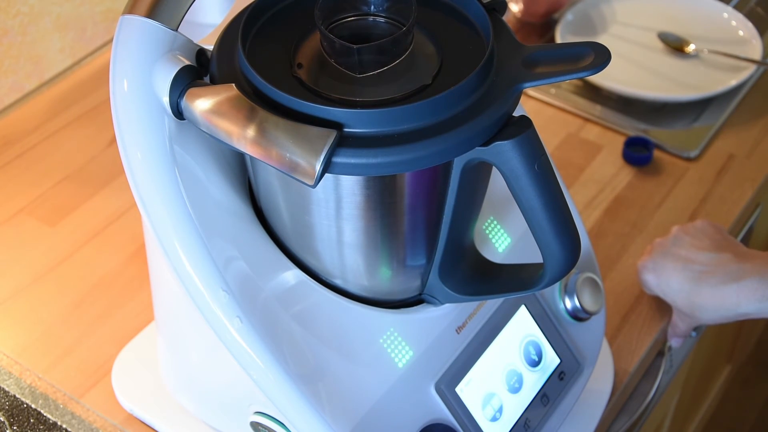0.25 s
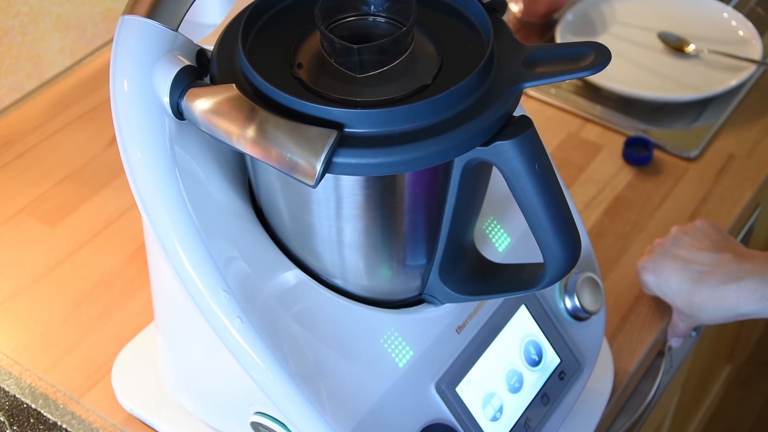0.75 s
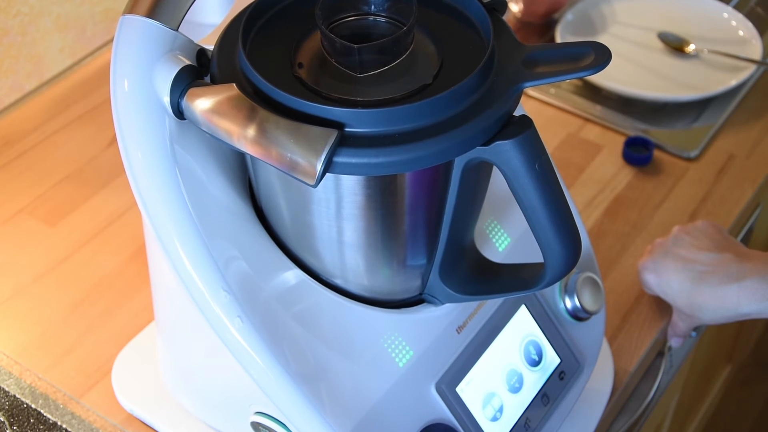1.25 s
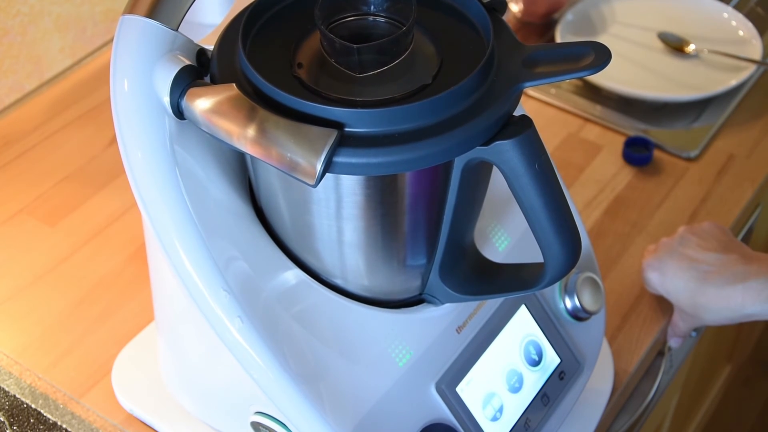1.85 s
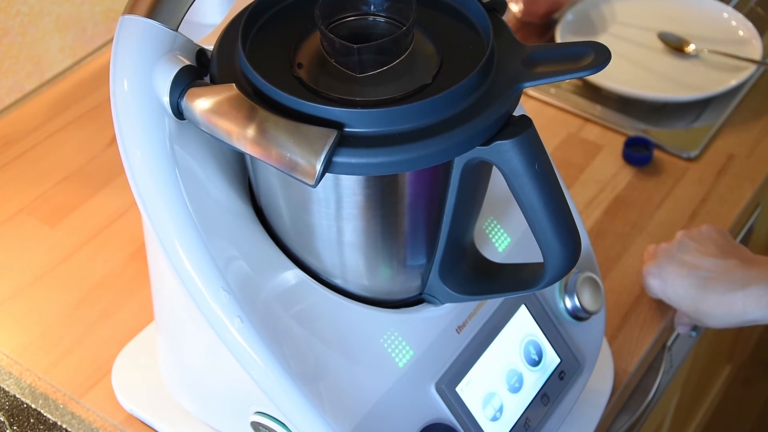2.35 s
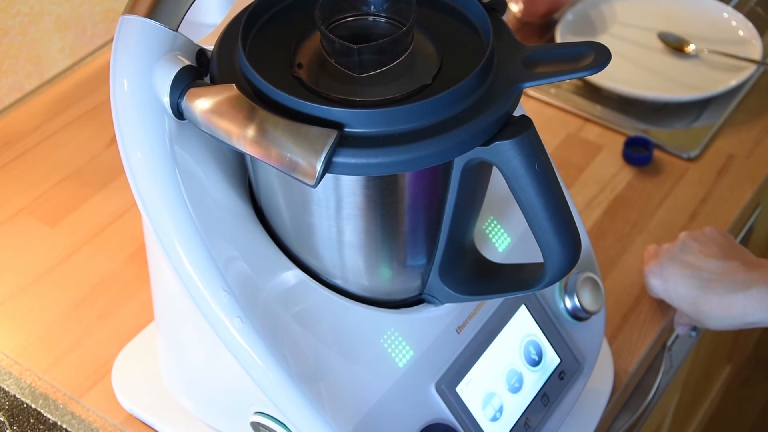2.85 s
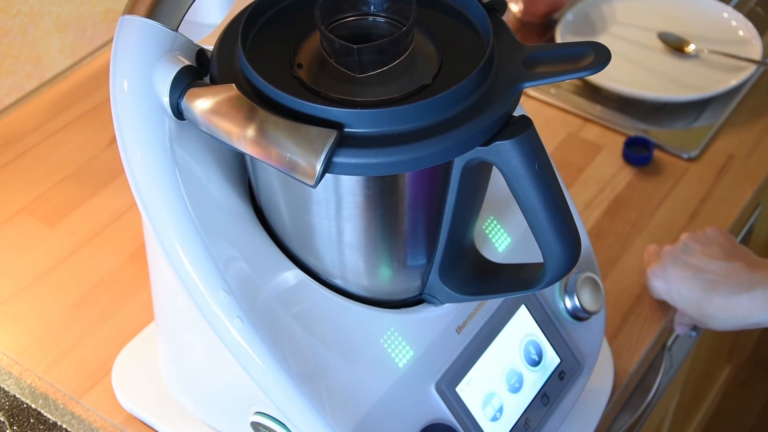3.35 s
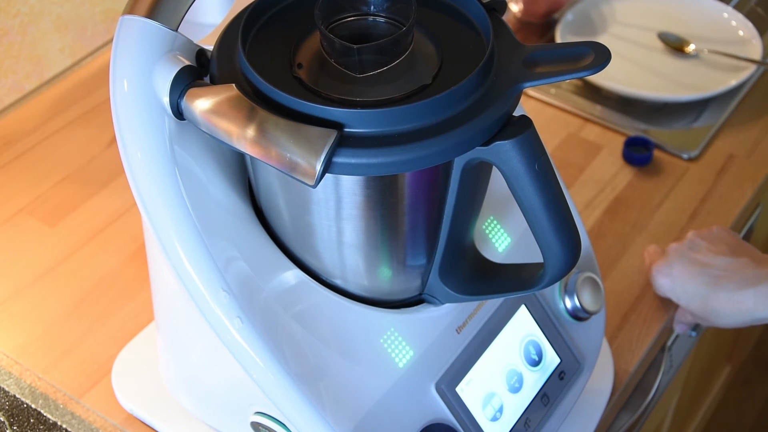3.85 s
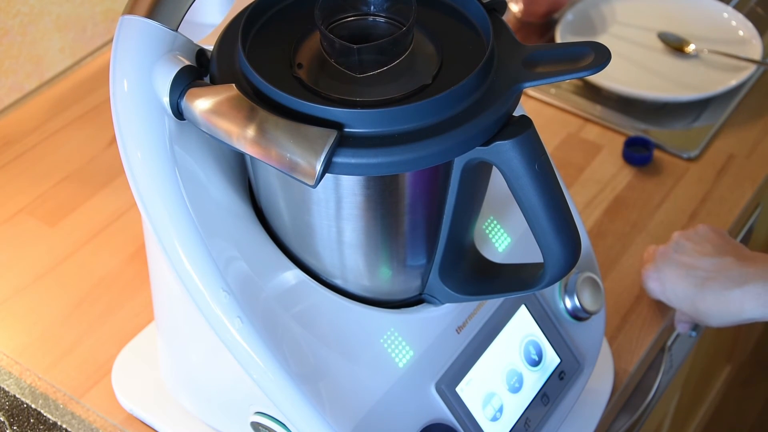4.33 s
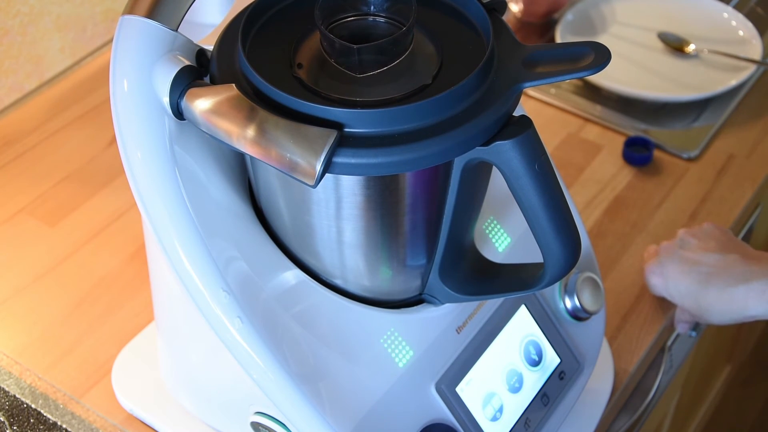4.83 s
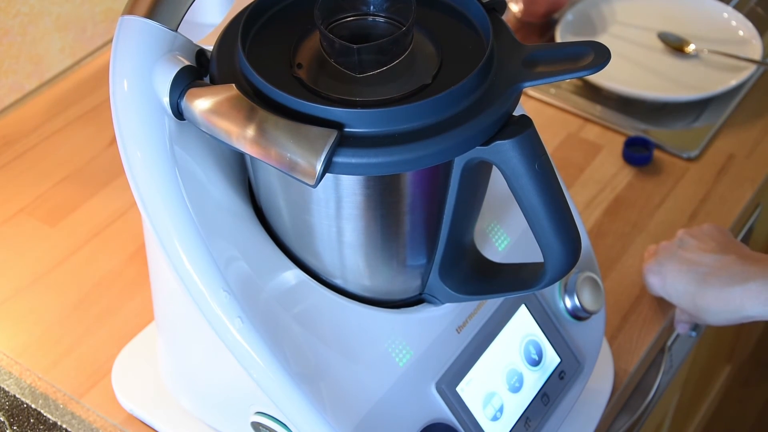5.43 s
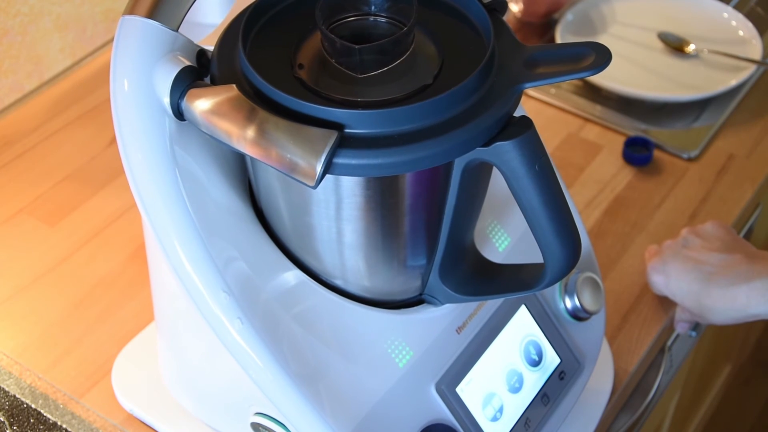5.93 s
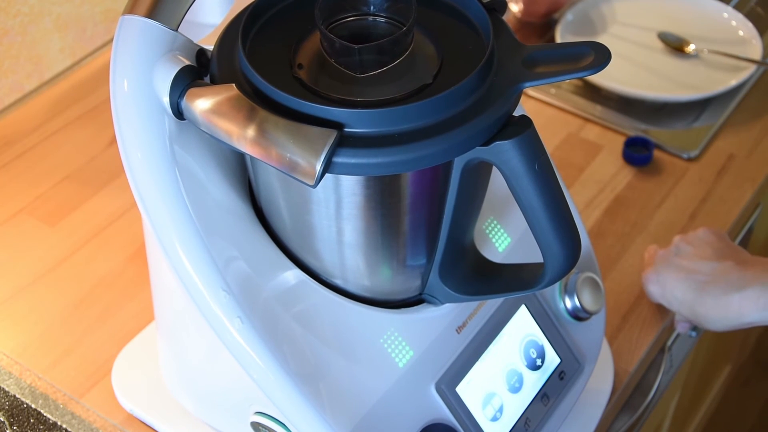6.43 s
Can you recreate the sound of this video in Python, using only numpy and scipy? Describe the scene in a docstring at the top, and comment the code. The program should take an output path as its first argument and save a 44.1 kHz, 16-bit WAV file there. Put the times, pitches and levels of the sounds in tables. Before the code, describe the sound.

A food processor runs twice, heard from close by in a small kitchen. The first burst is a rough motor churn with a wavering tone, dull thumps and light spatter on steel. It winds down, leaving soft room hiss. The second burst is brief and labours harder, with flurries of bits hitting the bowl, and a bright, ringing click of the lid lock follows.

```python
"""A small kitchen, close to a food processor that churns a thick mixture in two bursts.
Each burst strains against the settled mass, runs free and coasts down. The motor's rough knocking rings
the housing, while the blade thumps the mass and flings flurries of bits against the steel bowl.
The drive whines briefly as it starts and brakes; at the end the lid lock snaps and chatters."""
import sys
import numpy as np
from scipy import signal
from scipy.fft import rfft, irfft, next_fast_len
from scipy.io import wavfile
from scipy.ndimage import map_coordinates

SR = 44100
rng = np.random.default_rng(int(sys.argv[2]) if len(sys.argv) > 2 else 0)


def generate_wav(signal):
    """Clip the signal to [-1, 1] and save it as 16-bit WAV at the path in sys.argv[1]."""
    frames = np.transpose(np.atleast_2d(signal))
    scaled = np.clip(frames, -1, 1) * 32767
    pcm = np.round(scaled).astype(np.int16)
    wavfile.write(sys.argv[1], SR, pcm)


N = 295019
T = np.arange(N) / SR
SIZE = next_fast_len(N + SR // 4)
HZ = np.fft.rfftfreq(SIZE, 1 / SR)

# runs of the motor: start_s, brake_s, stiff_for_s, knock_db, stiff_strain_db, loose_strain_db,
# patter_db, churn_db
BURSTS = [(0.308, 2.631, 0.13, -24, -31.5, -42.5, -55.5, -42),
          (5.327, 6.167, 0.346, -23.5, -26, -29, -43, -38.5)]
ATTACK_S = 0.0088


def effort():
    """Gains of the motor's knocking, strain and free running: it labours until the mass gives way."""
    give_way_s = 0.014
    knocking, strain, freed = np.zeros((3, N))
    for start, brake, stiff_for, knock_db, stiff_db, loose_db, _, _ in BURSTS:
        turning = held(start, brake, ATTACK_S, fall_db_per_s=114)
        loose = (1 + np.tanh((T - start - stiff_for) / give_way_s)) / 2
        knocking += turning * amp(knock_db)
        strain += turning * amp(stiff_db + (loose_db - stiff_db) * loose)
        freed += turning * loose
    return knocking, strain, freed


def motor(knocking, strain):
    """Dense uneven knocks ring the housing; heavy load wakes further resonances; the drive hisses."""
    housing_colour = [(50, -52), (80, -62), (110, -33), (260, -21.5), (385, -21.5), (470, -16),
                      (700, -21.5), (850, -11.5), (1400, -13.5), (1950, -17), (2600, -19.5), (3000, -31.5),
                      (4200, -32), (6000, -43), (11500, -52), (15000, -67)]  # broad tone of the housing: freq_hz, level_db
    housing_modes = [(203.6, 14, -17), (295, 56, -19), (537.7, 26, -8), (573.4, 19.5, -3.5),
                     (936, 12, -5.5), (1031, 9.7, -3.5), (1090, 24, -6.5), (1256, 77, -15), (1292, 15, -6),
                     (1702, 215, -10.5), (1758, 30, -6), (1806, 33, -1), (1892, 30, -2), (2320, 20, -15),
                     (2513, 26, -15), (3446, 383, -27.5)]  # its free resonances: pitch_hz, width_hz, level_db
    strain_modes = [(190.8, 9.7, -5.5), (300, 41, -15.5), (815, 27, -7.5), (1064, 98, -0.5),
                    (1260, 75, -6.5), (1754, 130, 0.5), (2600, 430, -21)]  # its resonances under load: pitch_hz, width_hz, level_db
    hiss_modes = [(9800, 1000, 2), (11100, 700, 7)]  # peaks of the electrical hiss: pitch_hz, width_hz, level_db
    level = knocking * amp(0.47 * wobble(35) + 0.32 * wobble(8))
    housing = unit(filtered(impacts(rate=4500, scatter_db=1), body(housing_colour, housing_modes)))
    strained = unit(filtered(impacts(rate=2300, scatter_db=1), body(modes=strain_modes)))
    # load shifts the energy from the free resonances to the strained ones
    free = level / np.hypot(1, 0.74 * strain / (knocking + 1e-12))
    hiss = unit(filtered(rng.standard_normal(N), body(modes=hiss_modes)))
    hiss_db, hang_s = -57, 0.19
    powered = sum(held(start, brake + hang_s, ATTACK_S, fall_db_per_s=190) for start, brake, *_ in BURSTS)
    return free * housing + strain * strained + amp(hiss_db) * powered * hiss


def singing(freed):
    """Once the blade runs free, one housing resonance is kept going and sings as a wavering tone."""
    pitch_hz = 945.5 * (1 + 0.0135 * wobble(110))
    level = freed * amp(-29 + 1.05 * wobble(8) + 2.1 * wobble(70))
    return level * np.sin(2 * np.pi * np.cumsum(pitch_hz) / SR)


def jolts():
    """The sudden torque of each start shakes the whole machine."""
    kicks = [(0.318, -23), (5.334, -25.5)]  # torque kicks: start_s, level_db
    frame_modes = [(276, 29, 1), (540, 115, -1.5), (688, 44, -3.5), (871, 21, 0), (1580, 270, -1.5),
                   (3700, 1600, -22)]  # what they ring: pitch_hz, width_hz, level_db
    shake = sum(amp(db) * fading(start, t60=0.71) for start, db in kicks)
    return coloured(shake * rng.standard_normal(N), body(modes=frame_modes))


def churn():
    """The blade beats the thick mass, hardest at first, and now and then a lump drops."""
    lumps = [(0.316, 0.0092, -31), (0.742, 0.018, -24), (1.587, 0.016, -31), (1.866, 0.014, -28),
             (2.185, 0.018, -26), (2.867, 0.0075, -37.5), (2.933, .015, -40), (5.33, .025, -25),
             (5.404, .02, -34), (6.151, 0.16, -36)]  # falling lumps: start_s, length_s, relative_db
    # dull tone of the mass and of a lump: freq_hz, level_db
    mass = body([(50, -63), (90, -14), (120, -5), (155, -5), (195, 6.5), (300, -1.5), (380, -7),
                 (1200, -52)])
    lump = body([(50, -54), (85, -22), (125, 0), (200, 4.5), (300, 1), (400, -7), (1200, -52)])
    load = np.zeros(N)
    for start, brake, *_, churn_db in BURSTS:
        first_cuts = amp(-28) * fading(start, t60=0.56)
        load += held(start, brake, ATTACK_S, fall_db_per_s=75) * np.hypot(amp(churn_db), first_cuts)
    beating = load * amp(3.2 * wobble(12) - 6) * unit(filtered(impacts(rate=200, scatter_db=0), mass))
    drops = sum(amp(db) * held(start, start + length, rise_s=0.0022, fall_db_per_s=450)
                for start, length, db in lumps)
    return beating + amp(-11.5) * coloured(drops * rng.standard_normal(N), lump)


def patter():
    """Gain of the bits hitting the bowl: a shower at each start, a steady trickle, flurries on top."""
    flurries = [(0.355, 0.039, -36), (0.478, 0.078, -44.5), (1.434, .01, -45), (1.579, .025, -40.5),
                (1.634, 0.028, -37), (1.68, 0.035, -38), (1.863, 0.018, -48), (1.964, .02, -53),
                (2.133, 0.015, -43), (2.244, .025, -44), (2.478, .01, -46), (2.596, .04, -41),
                (5.724, 0.024, -34), (5.81, 0.024, -41), (5.858, .04, -34.5), (5.926, 0.027, -35.5),
                (5.975, 0.021, -33), (6.026, 0.032, -33.5), (6.06, 0.033, -32), (6.127, 0.073, -36.5),
                (6.23, 0.044, -35)]  # clusters of flung bits: start_s, length_s, level_db
    gains = []
    for start, brake, *_, patter_db, _ in BURSTS:
        shower = amp(-36) * fading(start, t60=0.3)
        gains.append(held(start, brake, ATTACK_S, fall_db_per_s=64) * np.hypot(amp(patter_db), shower))
    for start, length, db in flurries:
        gains.append(amp(db) * held(start, start + length, rise_s=0.0048, fall_db_per_s=295))
    return np.linalg.norm(gains, axis=0)


def spray():
    """Flung bits patter on the steel wall; wet smears swish and a few hard bits tick."""
    bowl_colour = [(1500, -27.5), (3000, -8), (4800, -13), (9000, -17.5), (11500, -18), (13000, -33),
                   (15000, -39)]  # broad tone of the steel bowl: freq_hz, level_db
    bowl_modes = [(3304, 220, -1.5), (3846, 400, -3), (4290, 130, -4), (5481, 130, -15), (6167, 455, -11),
                  (7308, 370, -10), (7824, 180, -7), (8531, 400, -6), (9229, 400, -16), (12085, 120, -20)]  # its resonances: pitch_hz, width_hz, level_db
    swishes = [(.55, .12, -53), (1.245, 0.018, -50), (2.28, 0.091, -59), (2.475, 0.016, -43.5)]  # wet smears: centre_s, half_length_s, level_db
    swish_colour = [(5000, -32), (8500, -4), (10500, 4), (13000, -13), (15500, -20)]  # their airy tone: freq_hz, level_db
    ticks = [(.857, -24, 3340), (1.523, -26.5, 5200), (1.687, -25, 3300), (2.14, -33, 5800),
             (2.634, -22, 3730), (5.469, -17.5, 3530), (5.477, -20, 3570), (5.730, -21, 4100)]  # hard bits on the bowl: start_s, relative_db, pitch_hz
    steel = body(bowl_colour, bowl_modes)
    out = patter() * amp(1.86 * wobble(90)) * unit(filtered(impacts(rate=3000, scatter_db=2.5), steel))
    smears = sum(amp(db) * np.exp(-((T - centre) / half) ** 2) for centre, half, db in swishes)
    out += smears * unit(filtered(rng.standard_normal(N), amp(along(swish_colour, HZ))))
    ringing = filtered(rng.standard_normal(N), steel)
    for start, db, hz in ticks:
        ping = unit(signal.lfilter(*signal.iirpeak(hz, Q=6, fs=SR), ringing))
        out += amp(db - 10.5) * fading(start, t60=0.053) * ping
    return out


def lid_lock():
    """The lid lock snaps and chatters: bright clicks over the ring of its arms."""
    contacts = [(6.6044, -16, -16), (6.6084, -20.5, -1), (6.6135, -27, -7), (6.632, -31, -3),
                (6.643, -35, 3), (6.669, -37.5, 11), (6.680, -40, 12.5)]  # hits of the lock: start_s, relative_db, ring_offset_db
    click_colour = [(200, -36), (380, -15.5), (520, -2), (680, -1), (1000, -4), (1400, -15), (2300, -9),
                    (3100, -3), (4100, 1), (4900, -28), (7000, -29), (8200, -23), (11000, -24),
                    (15000, -44)]  # tone of a click: freq_hz, level_db
    arm_modes = [(539, 3.5, 0.12), (962, -9.5, 0.36), (1090, -5.5, 0.15), (1716, -12, 0.73),
                 (3020, -10, .08), (3920, -19, 0.14), (3790, -3, 0.12)]  # ring of the arms: pitch_hz, level_db, t60_s
    t = np.arange(SR // 4) / SR
    onset = 1 - np.exp(-(t / 0.0032) ** 2)
    rings = np.zeros(N + SR)
    for start, db, ring_db in contacts:
        for hz, mode_db, t60 in arm_modes:
            decay = amp(mode_db + rng.normal(0, 1)) * np.exp(-np.log(1000) * t / t60)
            partial = onset * decay * np.sin(2 * np.pi * (hz * t + rng.random()))
            rings[round(start * SR):][:len(t)] += amp(db + ring_db - 4.5) * partial
    clicks = sum(amp(db) * (fading(start, t60=0.015) + amp(-14) * fading(start, t60=0.24))
                 for start, db, _ in contacts)
    return rings[:N] + amp(-5) * coloured(clicks * rng.standard_normal(N), body(click_colour))


def whine():
    """At low speed the motor's pull is heard as short gliding tones, roughest just before it spins up."""
    glides = [(0.239, .066, 1840, 1800, -55.5, 0.025), (2.745, 0.085, 560, 540, -39, .008),
              (2.808, 0.097, 481.6, 473, -49.5, 0.011), (3.036, 0.091, 952, 946, -57, 0.013),
              (5.257, 0.081, 1800, 1700, -58, 0.04), (6.324, 0.076, 500, 504, -51, 0.015),
              (6.547, 0.067, 995, 925, -59, 0.013)]  # slow-turning drive: start_s, length_s, from_hz, to_hz, level_db, flutter_share
    harmonic_colour = [(500, -35), (950, 2.5), (1100, 0), (1400, -21), (1650, -2), (1900, 0.5), (2200, -12),
                       (2800, -14), (3400, -17), (3800, -36), (5000, -70)]  # weight of the harmonics: freq_hz, level_db
    out = np.zeros(N)
    flutter, swell = wobble(200), wobble(120)
    for start, length, from_hz, to_hz, db, rough in glides:
        progress = (T - start) / length
        live = (progress > 0) & (progress < 1)
        pitch = (from_hz + (to_hz - from_hz) * progress[live]) * (1 + rough * flutter[live])
        phase = 2 * np.pi * np.cumsum(pitch) / SR
        tone = sum(amp(along(harmonic_colour, k * pitch)) * np.sin(k * phase) for k in range(1, 7))
        arch = np.sqrt(np.sin(np.pi * progress[live]))
        out[live] += amp(db + 2 * swell[live]) * unit(tone * arch)
    return out


def spatters(knocking):
    """Single drops smack the lid at random while the blade turns."""
    wet_colour = [(3000, -30), (5500, -4), (9000, -5), (11000, -1), (13500, -20), (15500, -26)]  # tone of a drop: freq_hz, level_db
    hits = impacts(rate=14, scatter_db=4)
    smack = np.exp(-np.log(1000) * T[:SR // 20] / 0.02) * rng.standard_normal(SR // 20)
    drops = signal.fftconvolve(hits, smack)[:N]
    return knocking * amp(-36.5) * unit(filtered(drops, body(wet_colour)))


def kitchen(x):
    """Walls and cupboards answer with a short tail, widest in the treble."""
    decay_times = [(200, 0.072), (2000, 0.41), (10000, 0.11)]  # decay of the room: freq_hz, t60_s
    stereo_width = [(130, -38), (300, -69), (650, -32), (1000, -12), (2000, -11), (4000, -3.5), (8000, -9),
                    (12000, 6)]  # spread of the reflections: freq_hz, side_db
    hz, t, noise = signal.stft(rng.standard_normal((2, SR // 2)), SR, nperseg=256)
    decay = np.exp(-np.log(1000) * t / along(decay_times, hz)[:, None])
    tail = signal.istft(noise * decay, SR, nperseg=256)[1]
    tail = np.pad(tail / np.linalg.norm(tail[0]), ((0, 0), (SR // 300, 0)))  # pre-delay
    mid, side = signal.fftconvolve(x[None], tail, axes=1)[:, :N]
    side = filtered(side, amp(along(stereo_width, HZ)))
    return np.array([mid + side, mid - side])


def room_tone():
    """The steady soft hiss of the room with a few faint tones."""
    air_colour = [(25, -13), (80, -3), (170, -4), (300, -1), (700, 0), (1000, -2), (2000, -7), (3500, -10),
                  (10000, -13.5), (12000, -17), (15500, -19.5)]  # tone of the hiss: freq_hz, level_db
    faint_tones = [(1154, 22, 1.5), (1465, 13, 4.5), (3920, 40, -4)]  # narrow peaks in it: pitch_hz, width_hz, level_db
    likeness = [(60, 0.74), (240, 0.9), (950, 0.71), (3770, 0.16), (15000, -0.08)]  # how alike left and right are: freq_hz, coherence
    spread = np.arccos(np.clip(along(likeness, HZ), -1, 1)) / 2
    response = body(air_colour, faint_tones) * np.array([np.cos(spread), np.sin(spread)])
    mid, side = filtered(rng.standard_normal((2, N)), response)
    return amp(-57.5) * unit(np.array([mid + side, mid - side]))


def amp(db):
    """Decibels to gain."""
    return 10 ** (np.asarray(db) / 20)


def unit(x):
    """Scale to rms 1."""
    return x / np.sqrt(np.mean(x ** 2) + 1e-20)


def along(points, hz):
    """Read (freq_hz, value) points on a log frequency axis."""
    freqs, values = np.transpose(points)
    return np.interp(np.log(hz + 1), np.log(freqs + 1), values)


def wobble(rate):
    """A smooth random curve, rate knots a second."""
    return map_coordinates(rng.standard_normal(int(N * rate / SR) + 4), [T * rate], mode="nearest")


def impacts(rate, scatter_db):
    """Irregular impulses, about rate a second, scattered in level."""
    hits = (rng.random(N) < rate / SR) * rng.choice([-1, 1], N)
    return hits * amp(scatter_db * np.clip(rng.standard_normal(N), -2, 2))


def held(start, stop, rise_s, fall_db_per_s):
    """An envelope that rises at start, holds until stop and then falls steadily."""
    return np.clip((T - start) / rise_s, 0, 1) * amp(-fall_db_per_s * np.maximum(T - stop, 0))


def fading(start, t60):
    """An envelope that jumps up at start and loses 60 dB in t60 seconds."""
    return (T >= start) * np.exp(-np.log(1000) * np.abs(T - start) / t60)


def body(colour=None, modes=()):
    """Causal response of a broad colour with resonances standing out of it."""
    power = amp(along(colour, HZ)) ** 2 if colour is not None else np.zeros(len(HZ))
    for hz, width, db in modes:
        detuning = (HZ ** 2 - hz ** 2) / ((HZ + 1) * width)
        power += amp(db) ** 2 / np.hypot(1, detuning) ** 3
    # minimum phase: the ring follows the hit
    cepstrum = irfft(np.log(power + 1e-12) / 2, SIZE)
    cepstrum[1:SIZE // 2] *= 2
    cepstrum[SIZE // 2 + 1:] = 0
    return np.exp(rfft(cepstrum))


def filtered(x, gain):
    """x through a response on the HZ grid."""
    return irfft(rfft(x, SIZE) * gain, SIZE)[..., :N]


def coloured(x, response):
    """x through a response scaled to an average power gain of 1."""
    return filtered(x, response / np.sqrt(np.mean(np.abs(response) ** 2)))


def scene():
    """The machine close by, its room, and the quiet behind it."""
    knocking, strain, freed = effort()
    machine = motor(knocking, strain) + singing(freed) + spray() + jolts() + churn()
    machine += whine() + lid_lock() + spatters(knocking)
    return machine + amp(-12) * kitchen(machine) + room_tone()


def record(dry):
    """A steep high cut removes the very top of the treble."""
    top_hz = 15800
    return filtered(dry, HZ < top_hz)


dry = scene()
out = record(dry)
generate_wav(out)
```